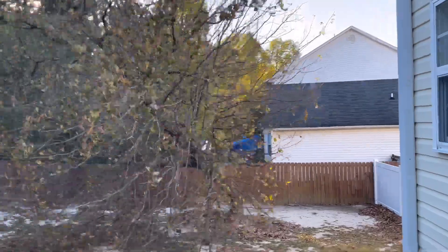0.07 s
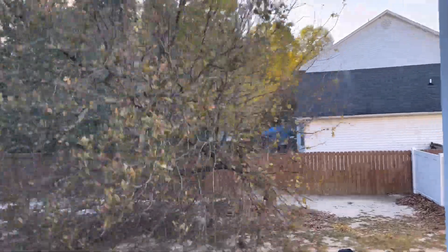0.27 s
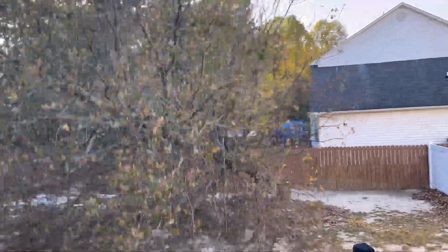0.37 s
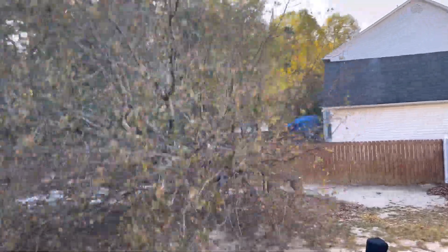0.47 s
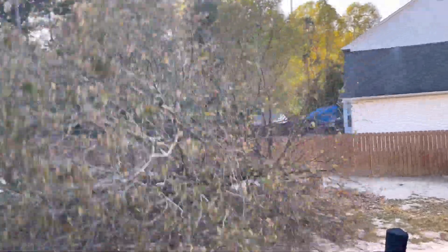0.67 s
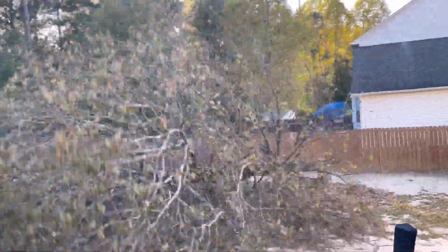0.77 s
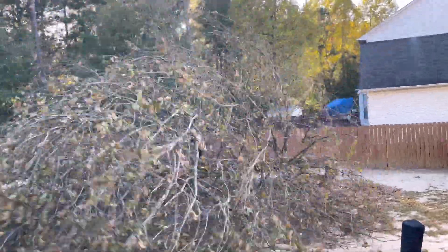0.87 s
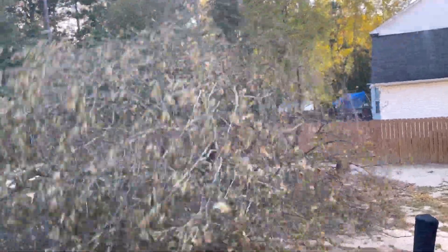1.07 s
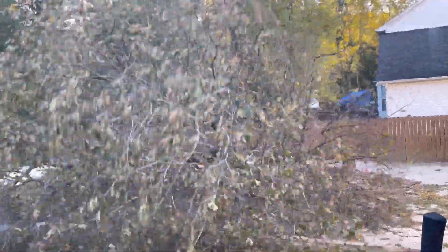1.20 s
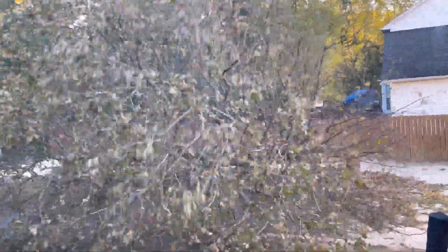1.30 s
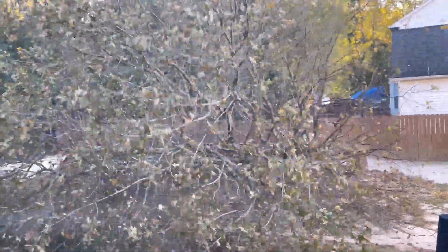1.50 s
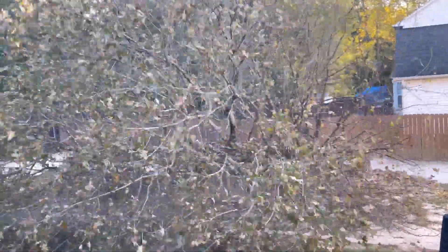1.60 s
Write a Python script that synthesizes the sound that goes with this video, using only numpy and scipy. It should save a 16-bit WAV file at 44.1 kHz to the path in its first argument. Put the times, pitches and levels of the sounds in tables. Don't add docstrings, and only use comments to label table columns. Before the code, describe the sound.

A cut leafy tree topples, dry leaves rushing and branches snapping as its crown hits the ground

```python
import sys
import numpy as np
from scipy import signal
from scipy.fft import rfft, irfft, next_fast_len
from scipy.io import wavfile
from scipy.ndimage import uniform_filter1d

SR = 44100
rng = np.random.default_rng(int(sys.argv[2]) if len(sys.argv) > 2 else 0)


def field_ratio(decibels):
    return 10 ** (np.asarray(decibels, dtype=float) / 20)


def digitize_waveform(pressure):
    field = np.atleast_2d(pressure).T
    bounded = np.clip(field, -1, 1)
    quanta = np.round(bounded * 32767).astype(np.int16)
    wavfile.write(sys.argv[1], SR, quanta)


N = 72765

# time_s, level_db
CROWN_SHAKE = [(0, -38), (.1, -37), (.25, -30), (.39, -26), (.45, -24.5), (.51, -22), (.555, -20),
               (.62, -19), (.68, -19.5), (.77, -19), (.95, -21), (1.02, -23), (1.09, -25.5), (1.13, -26),
               (1.3, -31), (1.45, -35), (1.55, -38), (1.65, -39)]


def evened(x):
    return x / np.sqrt(np.mean(x ** 2) + 1e-20)


def read(points, hz):
    table_hz, value = np.transpose(points)
    return np.interp(np.log(hz + 1), np.log(table_hz + 1), value)


def curve(points, lead_s=0):
    table_s, value = np.transpose(points)
    return np.interp(np.arange(N) / SR + lead_s, table_s, value)


def colour(x, points):
    fft_size = next_fast_len(N + 4096)
    gain = field_ratio(read(points, np.fft.rfftfreq(fft_size, 1 / SR)))
    shaped = irfft(rfft(x, fft_size) * gain, fft_size)
    return evened(shaped[..., :N])


def flutter(depth_db, top_hz):
    rate_hz = np.geomspace(7, top_hz, num=24)[:, None]
    cycles = rate_hz * np.arange(N) / SR + rng.random((24, 1))
    waves = np.sin(2 * np.pi * cycles) / np.sqrt(rate_hz)
    return depth_db * evened(waves.sum(0))


def rattle(per_s, spread_db, ring_s, count=16):
    size_db = spread_db * np.minimum(rng.exponential(1, (2, N)), 5)
    hits = field_ratio(size_db) * (rng.random((2, N)) < per_s / SR)
    kind = rng.integers(0, count, (2, N))
    t = np.arange(2048) / SR
    out = np.zeros((2, N))
    for k in range(count):
        decay_s = ring_s * rng.uniform(0.62, 2.5)
        burst = rng.standard_normal(2048) * field_ratio(-60 * t / decay_s)
        spectrum = rfft(burst)
        hz_gain = abs(spectrum)
        burst = irfft(spectrum / np.sqrt(hz_gain * uniform_filter1d(hz_gain, size=60) + 1e-9))
        out += signal.oaconvolve(hits * (kind == k), burst[None], axes=1)[:, :N]
    return out


def leaves():
    # freq_hz, level_db
    leaf_colour = [(1500, -18), (3000, -9.5), (6000, -7.5), (8800, -3.5), (10700, 1.5), (11800, -4.5),
                   (13100, -30), (15500, -21)]
    level_db = curve(CROWN_SHAKE) + 1.47 + flutter(0.59, top_hz=34.84)
    ticks = rattle(per_s=10000, spread_db=0.5, ring_s=0.0039)
    return field_ratio(level_db) * colour(ticks, leaf_colour)


def twigs():
    # freq_hz, level_db
    twig_colour = [(250, -12), (600, -7), (1000, -2.5), (1500, -2), (2800, -2), (4500, -6), (8000, -14)]
    follow, twig_db = 0.99, -5
    shake_db = curve(CROWN_SHAKE, lead_s=0.026)
    peak_db = shake_db.max()
    level_db = peak_db + follow * (shake_db - peak_db) + twig_db + flutter(0.52, top_hz=25.16)
    cracks = rattle(per_s=7000, spread_db=2.0, ring_s=0.014)
    return field_ratio(level_db) * colour(cracks, twig_colour)


def yard_air():
    # freq_hz, level_db
    yard_colour = [(20, -34), (45, -7), (75, 5.5), (150, -15), (500, -16.5), (1500, -9.5), (8000, -26),
                   (14000, -15)]
    start_db, fade_db_per_s = -49 + 3.5, -5
    level_db = start_db + fade_db_per_s * np.arange(N) / SR
    return field_ratio(level_db) * colour(rng.standard_normal((2, N)), yard_colour)


def limbs():
    # time_s, level_db
    ground_load = [(0, -54.5), (.426, -45.5), (.47, -42), (.55, -34), (.6, -33), (.64, -30.5), (.74, -35),
                   (.8, -36), (1.12, -45.5), (1.184, -40.5), (1.342, -52), (1.562, -54.5), (1.65, -61)]
    # freq_hz, level_db
    limb_colour = [(40, -1), (90, -10), (150, 2), (220, 0.5), (350, -1), (600, -7.5), (1200, -28)]
    level_db = curve(ground_load) + 0.5 + flutter(0.87, top_hz=21.7)
    bumps = rattle(per_s=900, spread_db=2.5, ring_s=0.037)
    return field_ratio(level_db) * colour(bumps, limb_colour)


def struck(t, hz, peak_s):
    u = t / peak_s
    return np.e * u * np.exp(-u) * np.sin(2 * np.pi * hz * t)


def yard_echo():
    echo_s, echo_db = 0.19, -5
    t = np.arange(SR // 2) / SR
    tail = rng.standard_normal((2, len(t))) * field_ratio(-60 * t / echo_s) * (t > .008)
    return field_ratio(echo_db) * tail / np.linalg.norm(tail[0])


def snaps():
    # start_s, peak_db, ring_hz, thump_db
    branch_snaps = [(.373, -20, 3130, -36), (.483, -19.5, 2150, -5.5), (.486, -26, 705, 0),
                    (.489, -26.5, 429, 0), (.551, -14, 8100, -27), (.635, -12, 8300, -24),
                    (0.555, -21, 1375, -20), (.545, -27, 1560, -2.5), (0.569, -21, 4000, -15),
                    (.624, -21.5, 1110, -3), (0.627, -17, 1450, -17), (.632, -21, 896, -15),
                    (0.643, -15, 1405, -13), (.649, -24, 1500, -4), (.697, -18, 2180, -9),
                    (0.719, -29, 590, 0), (0.773, -18.5, 1350, -19), (.775, -16.5, 2490, -25),
                    (.779, -22.5, 867, -24), (.785, -27.5, 472, -3), (.793, -22, 960, -15),
                    (.803, -28, 950, -22), (.819, -18, 3000, -13.5)]
    ring_cycles, splinter_s, splinter_db = 5.14, 0.0053, -4.5
    thump_hz, thump_s = 216, 0.009
    direct = np.zeros(N + 2048)
    t = np.arange(2048) / SR
    thump = struck(t, thump_hz, thump_s / 3)
    for start_s, peak_db, ring_hz, thump_db in branch_snaps:
        ring = struck(t, ring_hz, ring_cycles / ring_hz / 3)
        splinters = signal.lfilter([.4], [1, -.6], rng.standard_normal(2048)) * np.exp(-t / splinter_s)
        snap = ring + field_ratio(splinter_db) * splinters + field_ratio(thump_db) * thump
        at = round(start_s * SR)
        direct[at:at + 2048] += field_ratio(peak_db) * snap
    echo = signal.fftconvolve(direct[None], yard_echo(), axes=1)[:, :N]
    return np.array([direct[:N], 0.37 * direct[:N]]) + echo


def ports(pair):
    # freq_hz, likeness_0_to_1
    port_likeness = [(100, .975), (300, .88), (900, .7), (1600, .45), (2400, .84), (5400, .82), (6400, .98),
                     (12000, .985)]
    # freq_hz, left_lead_rad
    left_lead = [(300, .04), (1000, .1), (1450, -.5), (1900, .3), (3000, .78), (4100, .35), (5200, .42),
                 (6800, 0)]
    # freq_hz, left_lead_rad
    case_twist = [(7200, 0), (8880, -.25), (9200, -1.3), (10260, -3.14), (11800, -6.05), (12600, -6.75),
                  (13700, -9.4), (14900, -12.5)]
    # freq_hz, left_minus_right_db
    left_louder = [(60, -.3), (200, -1), (600, .2), (1400, 3.4), (1900, 4), (3000, 1.2), (5200, 1.3),
                   (6600, 0)]
    fft_size = next_fast_len(N + 4096)
    hz = np.fft.rfftfreq(fft_size, 1 / SR)
    shared, split = rfft(pair, fft_size)
    lead_rad = read(left_lead, hz) + read(case_twist, hz)
    tilt = np.exp(1j * lead_rad / 2) * field_ratio(read(left_louder, hz) / 2)
    same = np.clip(read(port_likeness, hz), 0, 1)
    common = np.sqrt((1 + same) / 2) * shared
    apart = np.sqrt((1 - same) / 2) * split
    left, right = (common + apart) * tilt, (common - apart) / tilt
    return irfft(np.array([left, right]), fft_size)[:, :N]


def scene():
    return ports(leaves() + twigs() + yard_air() + limbs() + snaps())


def band_limit(x):
    return signal.sosfilt(signal.butter(12, 15640, fs=SR, output="sos"), x)


def record(dry):
    bass_cut = signal.butter(4, 45, "high", fs=SR, output="sos")
    return band_limit(signal.sosfilt(bass_cut, dry))


dry = scene()
out = record(dry)
digitize_waveform(out)
```